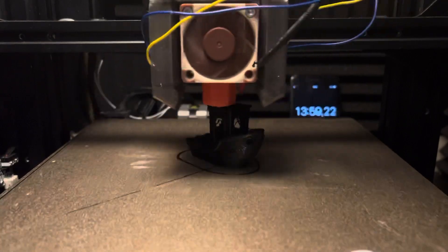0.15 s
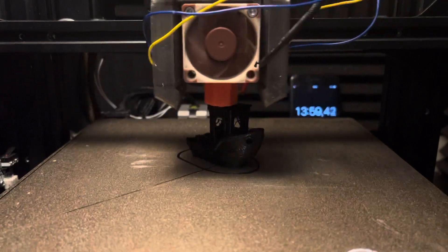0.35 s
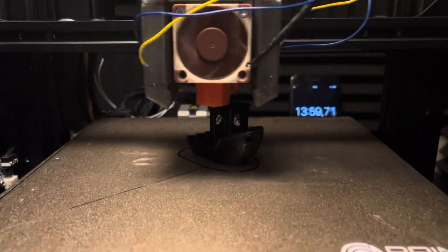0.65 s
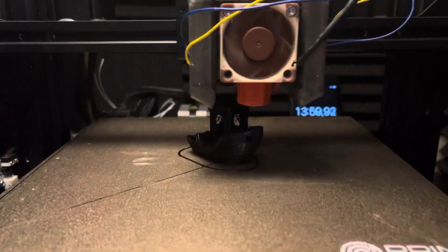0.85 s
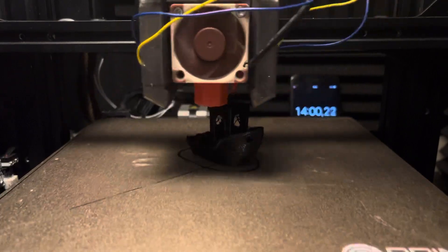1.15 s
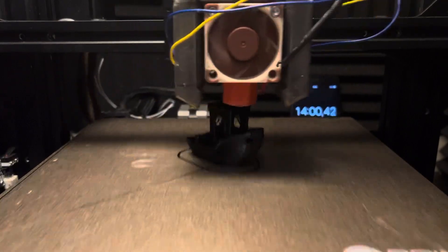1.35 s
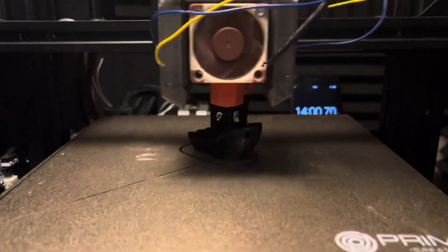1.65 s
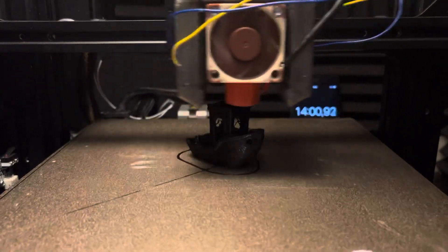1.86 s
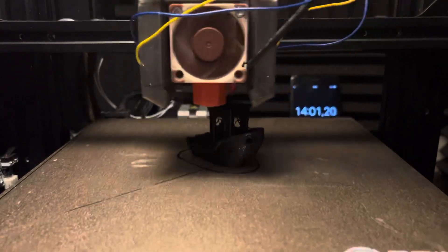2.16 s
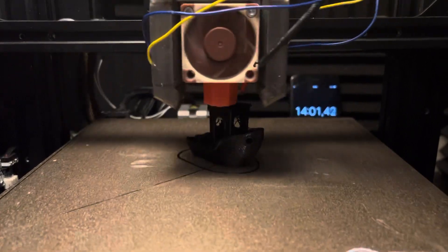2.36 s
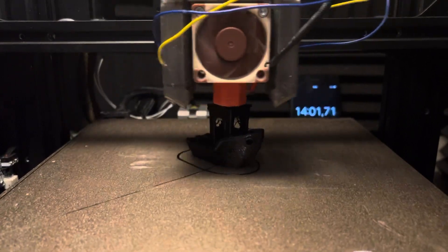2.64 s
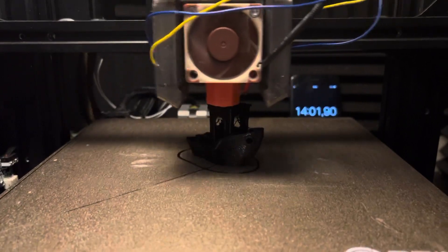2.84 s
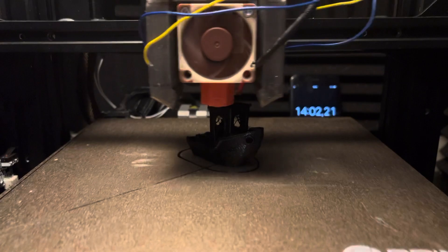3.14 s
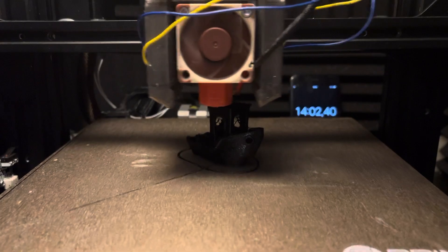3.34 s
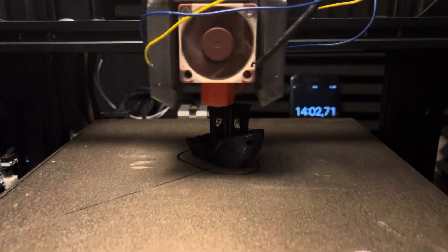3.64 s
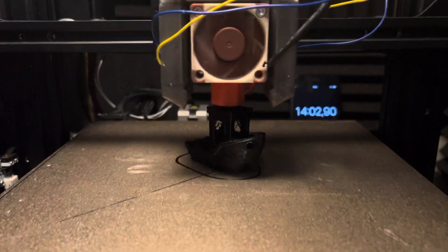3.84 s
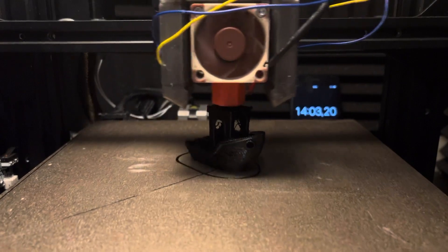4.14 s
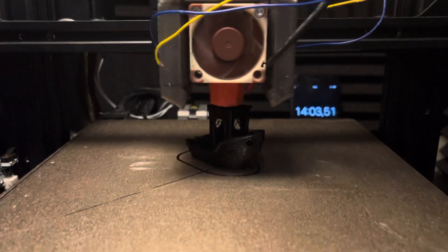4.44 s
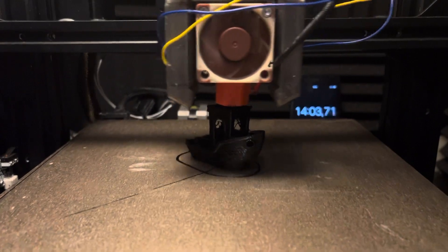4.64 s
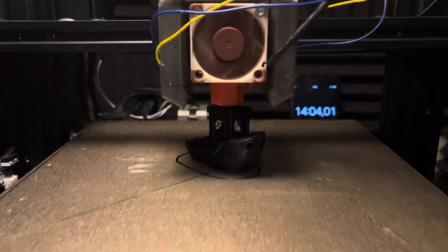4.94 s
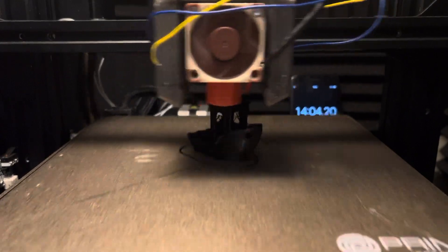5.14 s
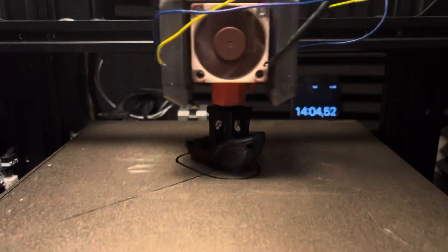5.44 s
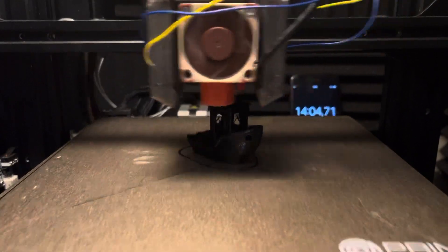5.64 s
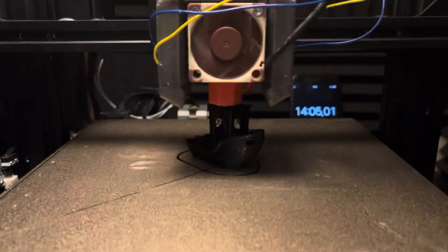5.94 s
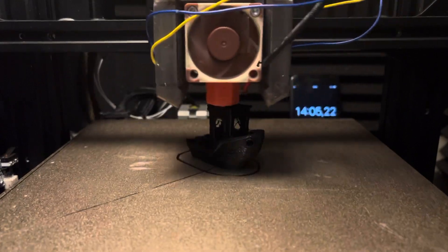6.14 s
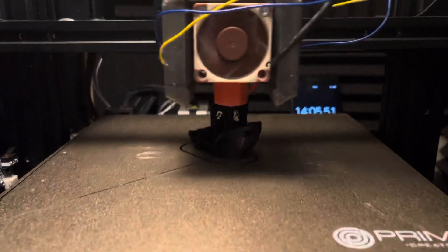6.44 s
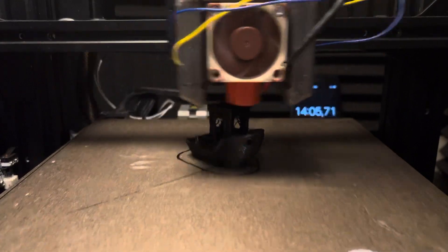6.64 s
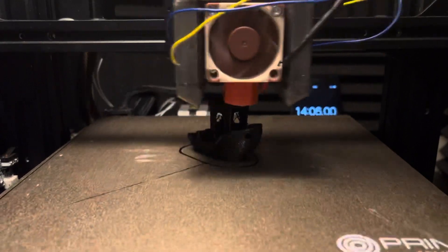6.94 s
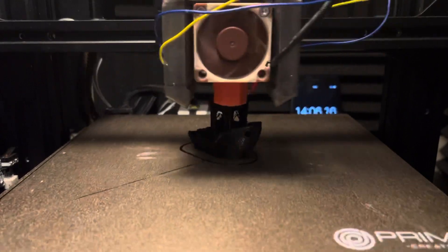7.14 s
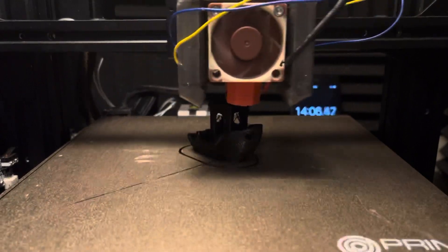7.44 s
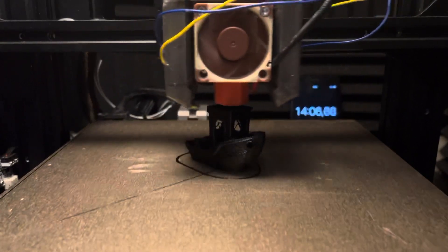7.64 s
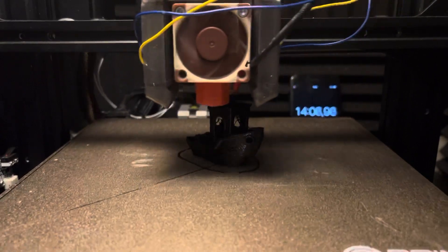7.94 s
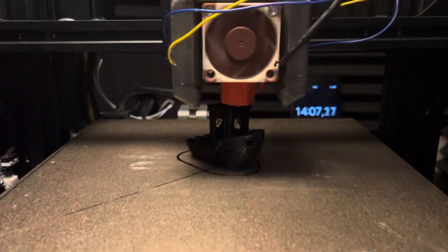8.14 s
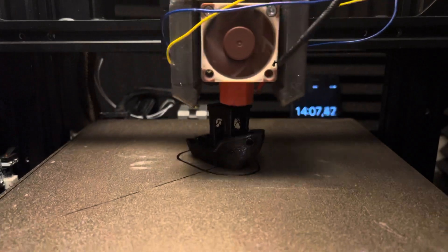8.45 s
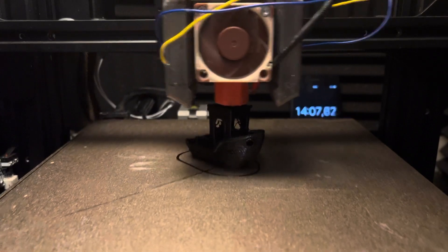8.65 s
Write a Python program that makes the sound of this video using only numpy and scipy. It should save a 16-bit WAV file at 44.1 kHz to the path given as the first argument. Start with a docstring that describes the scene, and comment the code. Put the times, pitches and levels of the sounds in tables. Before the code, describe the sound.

A desktop 3D printer works close to the microphone, heard in stereo and slightly stronger on the right. Its cooling fans rush, hum and whine steadily over an electrical hum and the low rumble of the shaking frame. Stepper motors give two flurries of short, arching whirrs, with brief swells of hum between them. Now and then the frame thuds dully as the bed reverses, and the print head ticks faintly.

```python
"""At a desk, close to a working 3D printer, heard by two microphone ports, the right one nearer.
Cooling fans rush, hum and whine over the low shaking of the frame, and the power supply hums at twice
the mains rate. The stepper motors give short whirrs that arch in pitch as each move speeds up and brakes,
and brief swells of hum come and go. The frame thuds when the bed reverses; the head ticks now and then."""
import sys
import numpy as np
from scipy import signal
from scipy.fft import rfft, irfft, next_fast_len
from scipy.io import wavfile
from scipy.ndimage import uniform_filter1d, map_coordinates

SR = 44100
rng = np.random.default_rng(int(sys.argv[2]) if len(sys.argv) > 2 else 0)


def wrap_up_sound(samples):
    """Save the sound to the file named by the first command line argument, as 16-bit audio."""
    columns = np.atleast_2d(samples).T
    # keep every value between -1 and 1, then stretch to whole-number steps
    tamed = np.clip(columns, -1, 1)
    steps = np.round(tamed * 32767).astype(np.int16)
    wavfile.write(sys.argv[1], SR, steps)


N = 387638

# Low end of the fan and frame noise: (frequency [Hz], left [relative dB], right [relative dB], likeness)
RUMBLE = [(15, -81, -80, .7), (30, -58.5, -65, .92), (62.5, -48.5, -51, 0.68), (109.4, -53, -50.5, 0.82),
          (153.5, -59.5, -61, 0.9), (186, -63.5, -63, 0.75), (244, -68.5, -63, 0.3),
          (271, -66.5, -57.5, 0.28), (328, -62, -59, 0), (368, -69, -61, 0.14), (398, -64.5, -62, 0.1),
          (417, -65.5, -68, 0.35), (432, -65.5, -67, 0.1), (504, -63, -62.5, 0.2),
          (570, -73.5, -63.5, 0.47), (620, -74.5, -63, 0.54), (646, -79, -69, 0.3), (696, -75, -66.5, 0.37),
          (820, -74, -73.5, 0.5)]


def fan_air():
    """Air rushing through the fans in three wavering bands: body, whirr and hiss."""
    # Mid and treble colour: (frequency [Hz], left [relative dB], right [relative dB], likeness)
    whirr_colour = [(760, -74, -71, .65), (900, -77, -71.5, .64), (1050, -74, -71, .84),
                    (1250, -76.5, -74.5, .77), (1400, -78, -75.5, .4), (1480, -78, -78.5, .79),
                    (1630, -78, -74.5, .62), (1770, -78, -77.5, .75), (1840, -79.5, -76, .78),
                    (1960, -81, -77, .8), (2090, -83.5, -84, .64), (2290, -86, -85, .75),
                    (2450, -84.5, -81, .78), (2600, -85.5, -81, .8), (2800, -85.5, -82.5, .77),
                    (3000, -87.5, -84.5, .56)]
    hiss_colour = [(3000, -87.5, -84, .45), (3250, -87, -81.5, .3), (3550, -87, -82, .3),
                   (3780, -87, -83, .55), (3900, -89.5, -87, .4), (4030, -92, -87, .45),
                   (4150, -91, -84.5, .62), (4300, -95, -86, .62), (4570, -97, -91, .2),
                   (4900, -96, -85.5, .3), (5100, -95.5, -89, .15), (5400, -95.5, -90, .52),
                   (5900, -98, -91, .4), (6200, -99, -95, .5), (6550, -98, -95, .48), (6850, -96, -95, .75),
                   (7100, -97.5, -96.5, .6), (7500, -99.5, -99.5, .5), (8150, -99, -99, .75),
                   (8500, -100, -100, .9), (8950, -103, -103, .95), (9280, -100, -100, .95),
                   (9450, -104, -104, .9), (10200, -105.5, -105.5, .8), (10600, -106, -106, .5),
                   (11000, -108.5, -109, .45), (11500, -111, -111, .7)]
    body = rush(RUMBLE, lambda hz: (hz >= 160) & (hz < 760), patchy_db=1.3)
    whirr = rush(whirr_colour, lambda hz: (hz >= 760) & (hz < 3000), patchy_db=.8)
    hiss = rush(hiss_colour, lambda hz: (hz >= 3000) / (1 + (hz / 11150) ** 120), patchy_db=.8)
    flow_db = .18 * wobble(8.9) + .4 * wobble(3.06)
    body_db = -39 + .8 * wobble(3.04)
    return amp(body_db) * body + amp(flow_db) * (amp(-48) * whirr + amp(-55.5) * hiss)


def big_fan():
    """The big fan hums at multiples of its slightly unsteady shaft speed."""
    # Shaft speed: (time [s], speed [turns/s])
    shaft = [(0, 87.5), (2, 87.4), (4.5, 87.1), (5.5, 86.6), (6.8, 86.7), (7.6, 87.4), (8.79, 87.5)]
    # Blade harmonics: (shaft multiple, left [dB], right [dB], left phase lead [rad])
    blades = [(1, -39, -44, 0.96), (2, -46, -51, 0.34), (4, -48, -44, .1), (6, -53, -47.5, .1),
              (8, -60, -56.5, 0.11)]
    turns = curve(shaft) + .2 * wobble(7)
    return sum(tone(multiple * turns, *stereo, unsteady_db=1.6) for multiple, *stereo in blades)


def power_supply():
    """The supply hums at twice the mains rate and about an octave above that."""
    # Hum partials: (frequency [Hz], left [dB], right [dB], left phase lead [rad])
    partials = [(100.24, -39, -34, -0.85), (200, -51, -41.5, -0.93)]
    return sum(tone(np.full(N, hz), *stereo, unsteady_db=.8) for hz, *stereo in partials)


def small_fans():
    """The small fans sing fuzzy tones, each swelling on its own, and one thin, wavering whistle."""
    # Fuzzy tones: (frequency [Hz], half width [Hz], left [dB], right [dB])
    whines = [(58, .5, -47, -47), (232, 2, -54, -52), (385, 6, -53, -48), (505, 8, -56, -55),
              (552, 2, -60, -51), (620, 10, -66, -55), (997, 20, -75, -67), (1205, 14, -69, -67),
              (1700, 30, -72, -59), (1890, 30, -69, -62.5), (1990, 25, -72, -68), (2160, 45, -66, -64.5),
              (2647, 12, -79, -74), (3500, 30, -76, -80), (3765, 16, -75, -71), (3885, 14, -79, -82),
              (6363, 14, -80, -78), (6860, 30, -82, -81), (8010, 50, -81, -81), (8330, 40, -82, -82),
              (9578, 25, -89, -89)]
    # Whistle pitch: (time [s], frequency [Hz])
    whistle_pitch = [(0, 3698), (2.5, 3705), (4, 3716), (5, 3712), (6, 3694), (7.2, 3686), (8.79, 3690)]
    fuzz = sum(amp([[left], [right]] + 1.8 * wobble(4)) * narrow(hz, width)
               for hz, width, left, right in whines)
    whistle_hz = curve(whistle_pitch) + 6 * wobble(25)
    return fuzz + tone(whistle_hz, left_db=-69.5, right_db=-67, lead=0, unsteady_db=1.8)


def travel_cues():
    """Cue list of the stepper motors' fast moves, each with a step tone and a whine."""
    # Travels, pitches at top speed: (middle [s], motor, step tone [Hz], tone [dB], whine [Hz], whine [dB])
    travels = [(.108, "head", 352, -32.5, 1400, -34), (.723, "bed", 248, -32.5, 1010, -31.5),
               (.787, "bed", 254, -38, 1090, -36), (.846, "bed", 260, -29.5, 980, -33),
               (.975, "bed", 256, -27.5, 990, -37), (1.1, "bed", 238, -33, 1000, -37),
               (1.289, "bed", 240, -32.5, 985, -38), (1.384, "head", 325, -39, 1335, -33),
               (1.392, "bed", 283, -34.5, 1000, -37), (1.497, "bed", 241, -36, 990, -42),
               (1.766, "bed", 246, -30, 1005, -35), (3.81, "bed", 254, -37.5, 1000, -39),
               (5.108, "bed", 238, -28.5, 890, -40), (5.155, "head", 321, -37, 1230, -36),
               (5.175, "bed", 250, -30, 1004, -38), (5.287, "bed", 238, -30.5, 1000, -32),
               (5.4, "head", 327, -44, 1400, -37), (5.405, "bed", 264, -37, 1000, -34),
               (5.678, "bed", 241, -34, 1076, -33), (5.706, "bed", 250, -45, 1015, -37),
               (5.79, "head", 346, -35, 1410, -33), (6.42, "bed", 259, -33, 1010, -32),
               (6.566, "bed", 240, -33.5, 998, -32), (6.675, "bed", 260, -30, 970, -38),
               (6.918, "bed", 250, -32.5, 1000, -30.5), (7.011, "bed", 272, -30.5, 1000, -47),
               (7.205, "bed", 249, -35.5, 1000, -38), (7.405, "head", 300, -41, 1200, -35)]
    # Travel shape by motor: (length [s], tone sag at both ends [share], whine sag [share], rasp [share])
    motors = {"bed": (.05, .078, .02, .25), "head": (.085, .35, .4, .3)}
    return [(s, *voice, motors[motor]) for s, motor, *voice in travels]


def hum_cues():
    """Cue list of brief swells of hum at about 300-530 Hz, plus fainter ones at random times and pitches."""
    # (middle [s], pitch [Hz], level [dB])
    hum_swells = [(.108, 519, -34.5), (1.52, 328, -34.5), (2.721, 513, -31.5), (3.04, 520, -34),
                  (3.1, 477, -36), (3.35, 530, -37), (3.45, 307, -35), (3.51, 494, -34), (3.64, 500, -37),
                  (3.717, 526, -30.5), (4.129, 405, -40), (5.187, 339, -33), (5.79, 511, -35),
                  (6.392, 373, -32), (6.89, 346, -36), (7.129, 346, -38), (7.34, 510, -35),
                  (7.624, 349, -33), (7.954, 395, -34), (8.36, 359, -34), (8.5, 365, -34)]
    length_s, sag, faint_per_s = .042, .086, 2.5
    count = int(faint_per_s * N / SR)
    times = rng.uniform(length_s, N / SR - length_s, count)
    pitch, softness = rng.standard_normal((count, 2)).T
    faint_swells = zip(times, 495 * 2 ** (.257 * pitch), -42 - .5 * softness)
    no_whine = (0, -np.inf)
    return [(s, hz, db, *no_whine, (length_s, sag, 0, 0)) for s, hz, db in [*hum_swells, *faint_swells]]


def steppers_and_swells():
    """Motors speed up and brake: tone and whine swell and arch, bearings rasp. Hum swells have no whine."""
    out = np.zeros((2, N))
    rasp = unit(np.convolve(narrow(1120, 250), np.hanning(15), "same"))
    quiver, frame_buzz = wobble(70), narrow(310, 90)
    for s, hum_hz, hum_db, whine_hz, whine_db, shape in travel_cues() + hum_cues():
        length, hum_sag, whine_sag, rasp_share = shape
        span, u = centred(s, length)
        shudder = 1 + .03 * quiver[span]
        hum = sweep(hum_hz * shudder * (1 - hum_sag * u ** 2))
        whine = sweep(whine_hz * shudder ** .3 * (1 - whine_sag * u ** 2))
        low = amp(hum_db) * (hum + .3 * frame_buzz[span])
        high = amp(whine_db) * ((1 - rasp_share) * whine + rasp_share * rasp[span])
        swell = np.cos(np.pi * u / 2) ** .85
        high *= swell ** .8  # the whine gathers around top speed
        out[:, span] += swell * (low * amp([[-1], [1.5]]) + high * amp([[-11], [-1]]))
    return filtered(out, ports)


def frame_thuds():
    """The bed reverses and the frame swings: a short, low pulse, strongest at its middle."""
    # Thuds: (middle [s], level [dB], pitch [Hz], length [s])
    thuds = [(.093, -13, 104, 0.017), (0.111, -19, 60, 0.04), (0.258, -19, 75.6, .035),
             (0.955, -21, 95.5, .065), (1.581, -27, 68, 0.092), (1.704, -20, 79, 0.026),
             (2.256, -22.5, 58.7, 0.059), (3.269, -21.5, 93, 0.049), (4.14, -23, 65, 0.056),
             (5.567, -28, 56.4, 0.029), (5.749, -17, 99, 0.015), (8.089, -24, 87.5, 0.095)]
    out = np.zeros(N)
    for s, db, hz, length in thuds:
        span, u = centred(s, length)
        swell = np.cos(np.pi * u / 2) ** 2
        out[span] += amp(db) * swell * np.cos(np.pi * hz * length * u)
    return out * amp([[-.7], [.7]])


def head_ticks():
    """Short ringing treble ticks; a brief flicker of very high hiss sounds with each."""
    # Ticks: (time [s], level [dB], ring centre [Hz], flicker [relative dB])
    ticks = [(0.0872, -51, 8700, -19), (1.5045, -49, 7750, -40), (1.7215, -55, 9800, -22),
             (1.9704, -54, 9000, -24), (4.0952, -52, 9400, -7), (5.1272, -53, 8200, -30),
             (5.157, -56, 9800, -28), (5.1694, -55, 9600, -25), (5.3946, -52, 7900, -40),
             (5.465, -53, 8000, -40), (5.759, -58, 10000, -8), (5.7658, -48, 9200, -10),
             (6.426, -52, 8500, -27), (6.914, -52, 7200, -40), (7.2674, -56, 10000, -20),
             (8.4856, -54, 10000, -18)]
    # Colour of the flicker: (frequency [Hz], gain [dB])
    flicker_colour = [(11400, -40), (11700, -9), (13600, -9), (14200, 0), (15700, 0)]
    width_octaves, t60_s, rise_s = .18, .04, .0028
    rings, flickers = np.zeros((2, N + SR))
    t = np.arange(SR // 20) / SR
    bins_hz = np.fft.rfftfreq(len(t), 1 / SR) + 1
    for s, db, centre_hz, flicker_db in ticks:
        ring_noise, hiss = rng.standard_normal((2, len(t)))
        band = np.exp(-.5 * (np.log2(bins_hz / centre_hz) / width_octaves) ** 2)
        ring = unit(irfft(rfft(ring_noise) * band, len(t)))
        envelope = amp(db - 60 * t / t60_s) * (1 - np.exp(-t / rise_s))
        rings[round(s * SR):][:len(t)] += envelope * ring
        flickers[round(s * SR):][:len(t)] += amp(flicker_db) * envelope * hiss
    rings = filtered(rings[:N], lambda hz: hz < 11500)
    flickers = filtered(flickers[:N], lambda hz: amp(np.interp(hz, *np.transpose(flicker_colour))))
    return rings + flickers * amp([[-2], [2.5]])


def frame_shake():
    """The shaking frame lays a slowly swelling rumble under everything."""
    # Rumble fader: (time [s], level [dB])
    fader = [(0, -37), (.5, -38.5), (1.2, -34), (2.4, -37), (4, -34.5), (5.1, -37), (5.5, -34),
             (7.3, -38.5), (8, -35.5), (8.79, -34)]
    return amp(curve(fader)) * rush(RUMBLE, lambda hz: hz < 160, patchy_db=.6)


def sheen():
    """A very faint band of hiss flickers near the top of hearing."""
    # (frequency [Hz], left [relative dB], right [relative dB], likeness)
    colour = [(14000, 0, -12, .36), (14700, 1, 6, .24), (15700, -9, -12, .5)]
    return amp(-84.5) * rush(colour, lambda hz: hz > 13800, patchy_db=4.5)


def rush(colour, band, patchy_db):
    """Patchy stereo noise in one band, rms 1 in mono; likeness runs from 0 (wide) to 1 (coherent)."""
    spectra = signal.stft(rng.standard_normal((2, N)), nperseg=512)[2]
    patches = uniform_filter1d(uniform_filter1d(rng.standard_normal(spectra.shape[1:]), 8, 0), 8, 1)
    mid, side = signal.istft(spectra * amp(patchy_db * unit(patches)), nperseg=512)[1][:, :N]
    knots_hz, left_db, right_db, likeness = np.transpose(colour)
    at = lambda hz, column: np.interp(np.log(hz + 1), np.log(knots_hz + 1), column)
    spread = lambda hz: np.arccos(np.clip(at(hz, likeness), 0, 1)) / 2
    gain = lambda hz: amp([at(hz, left_db), at(hz, right_db)]) * band(hz) * ports(hz)
    mid = filtered(mid, lambda hz: gain(hz) * np.cos(spread(hz)))
    side = filtered(side, lambda hz: gain(hz) * np.sin(spread(hz)) * [[1], [-1]])
    pair = mid + side
    return pair / np.std(pair.mean(axis=0))


def ports(hz):
    """Stereo placement: each microphone port takes half of the phase shift between the two."""
    # (frequency [Hz], left phase lead [rad])
    lead = [(0, 0), (150, 0), (400, -.6), (560, .4), (680, -2), (850, -2.5), (1400, -3.2), (1520, -3.5),
            (1650, -4.2), (1740, -3.85), (1880, -4.8), (1990, -4.7), (2130, -6.2), (3100, -7.7),
            (3850, -6.2), (4200, -7.3), (4950, -7.5), (5150, -3.9), (6370, -3.6), (8270, 0), (16000, 0)]
    return np.exp(.5j * np.interp(hz, *np.transpose(lead)) * np.array([[1], [-1]]))


def tone(hz, left_db, right_db, lead, unsteady_db):
    """A stereo sine following hz, its level drifting."""
    phase = 2 * np.pi * (np.cumsum(hz) / SR + rng.random()) + lead * np.array([[.5], [-.5]])
    return amp([[left_db], [right_db]]) * amp(unsteady_db * wobble(6)) * np.sqrt(2) * np.sin(phase)


def sweep(hz):
    """A plain sine following hz."""
    return np.sin(2 * np.pi * np.cumsum(hz) / SR)


def narrow(centre_hz, width_hz):
    """Noise of rms 1 in one resonance: a fuzzy tone."""
    return unit(filtered(rng.standard_normal(N), lambda hz: 1 / (1 + ((hz - centre_hz) / width_hz) ** 2)))


def filtered(x, response):
    """x through a complex frequency response."""
    size = next_fast_len(N + SR // 2)
    return irfft(rfft(x, size) * response(np.fft.rfftfreq(size, 1 / SR)), size)[..., :N]


def centred(middle_s, length_s):
    """An event's slice of samples and a ramp from -1 to 1 across it."""
    start, count = round((middle_s - length_s / 2) * SR), round(length_s * SR)
    return slice(start, start + count), np.linspace(-1, 1, count)


def wobble(rate):
    """A smooth random curve, rate knots a second."""
    return map_coordinates(rng.standard_normal(int(N * rate / SR) + 4), [np.arange(N) * rate / SR])


def curve(rows):
    """An automation line through (time [s], value) points."""
    return np.interp(np.arange(N) / SR, *np.transpose(rows))


def amp(db):
    """Gain of a level in dB."""
    return 10 ** (np.asarray(db) / 20)


def unit(x):
    """x at rms 1."""
    return x / np.sqrt(np.mean(x ** 2) + 1e-20)


def scene():
    """The printer's steady noise and hums, with its moves and knocks on top."""
    noise = frame_shake() + fan_air()
    hums = filtered(big_fan() + power_supply() + small_fans(), ports)
    return noise + hums + steppers_and_swells() + frame_thuds() + head_ticks() + sheen()


def record(dry):
    """A brick-wall low-pass trims the very top."""
    return filtered(dry, lambda hz: hz < 15750)


dry = scene()
out = record(dry)
wrap_up_sound(out)
```